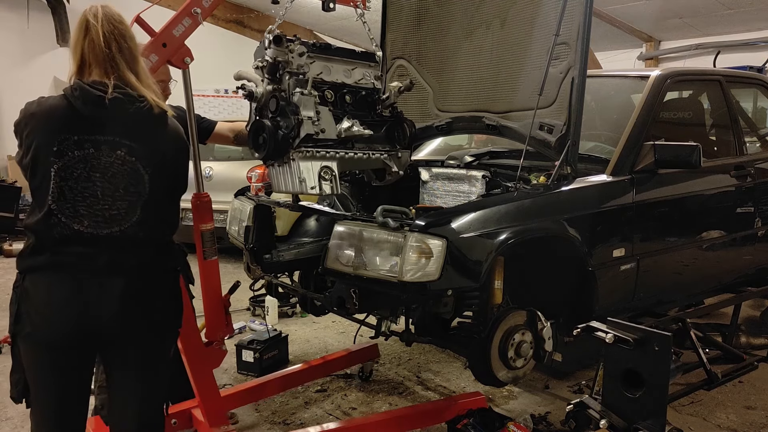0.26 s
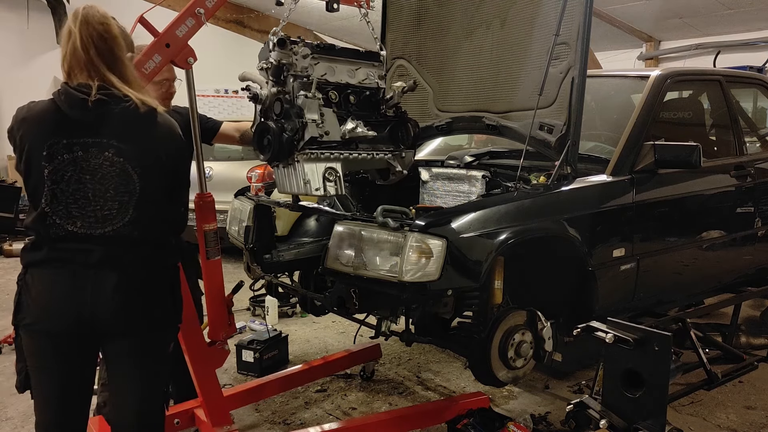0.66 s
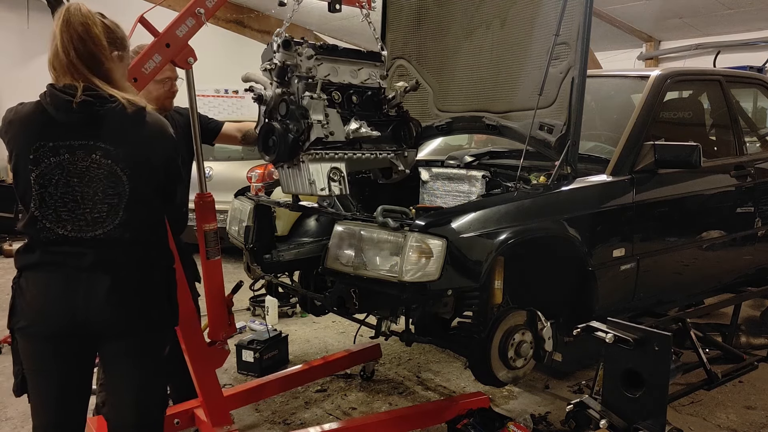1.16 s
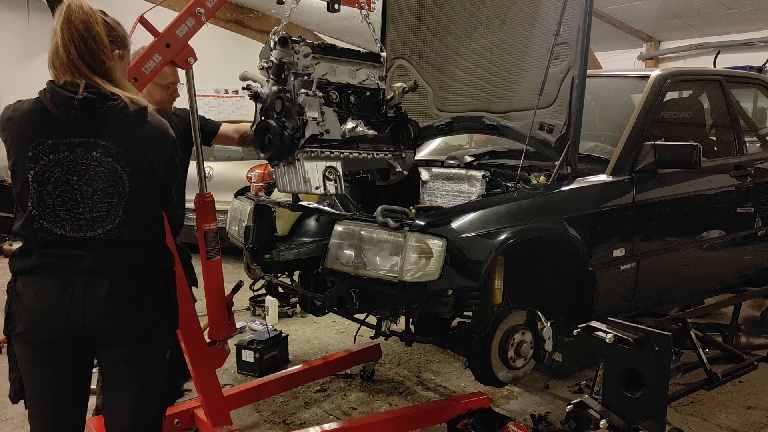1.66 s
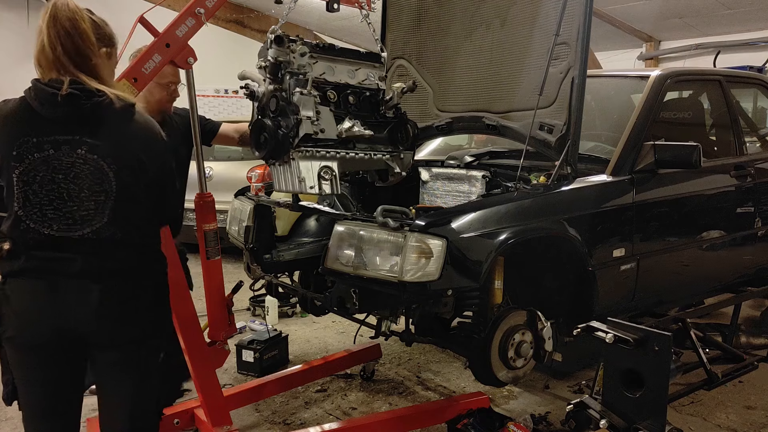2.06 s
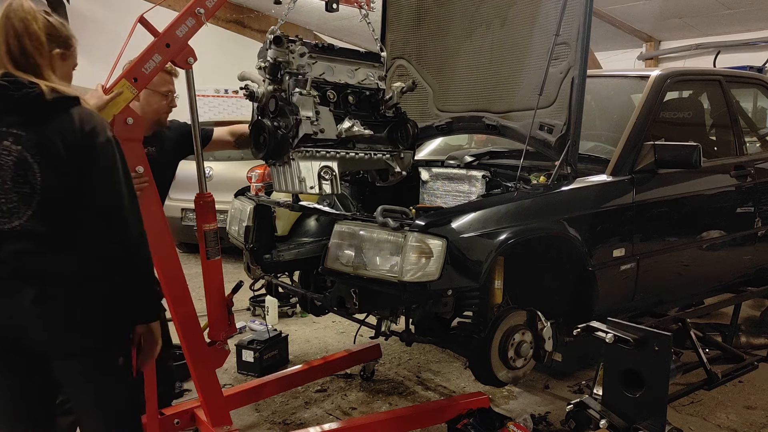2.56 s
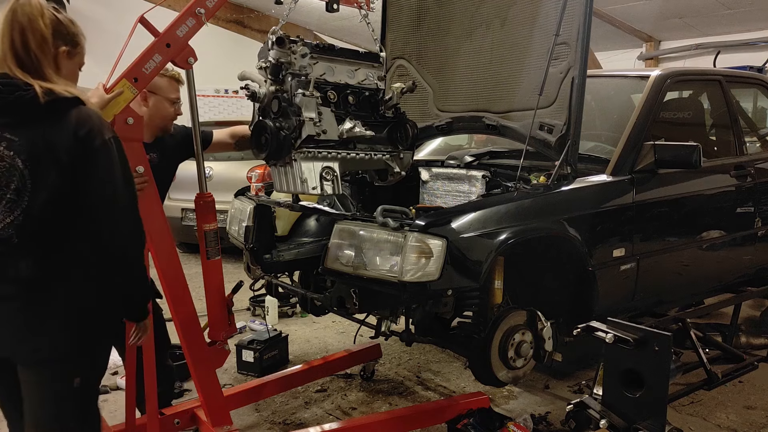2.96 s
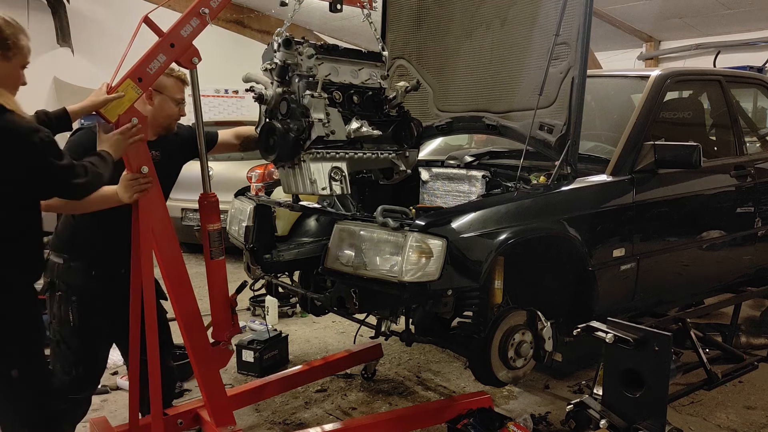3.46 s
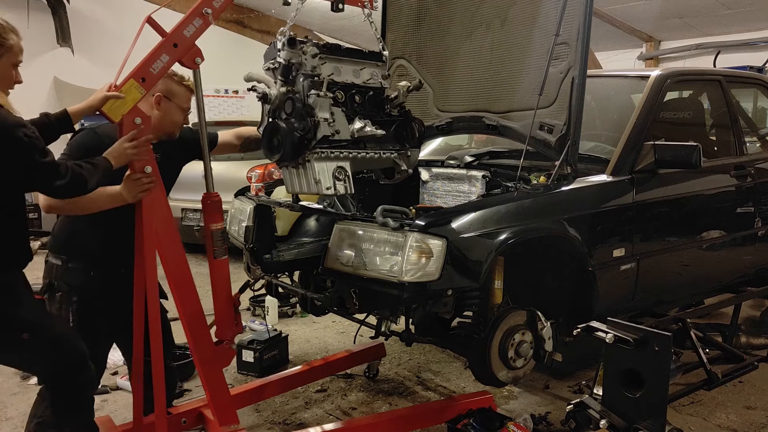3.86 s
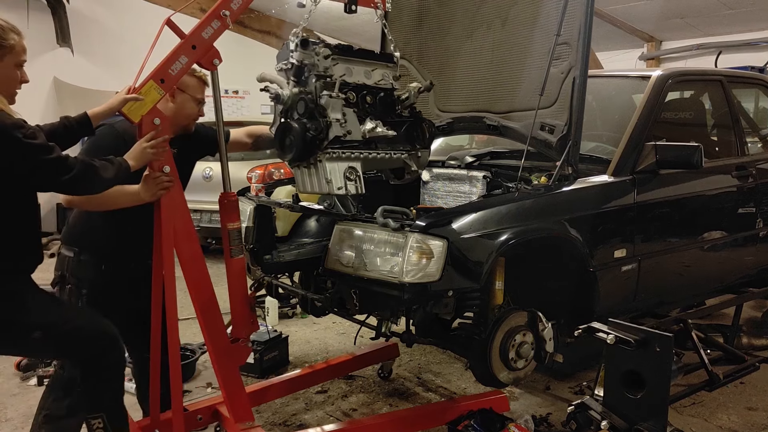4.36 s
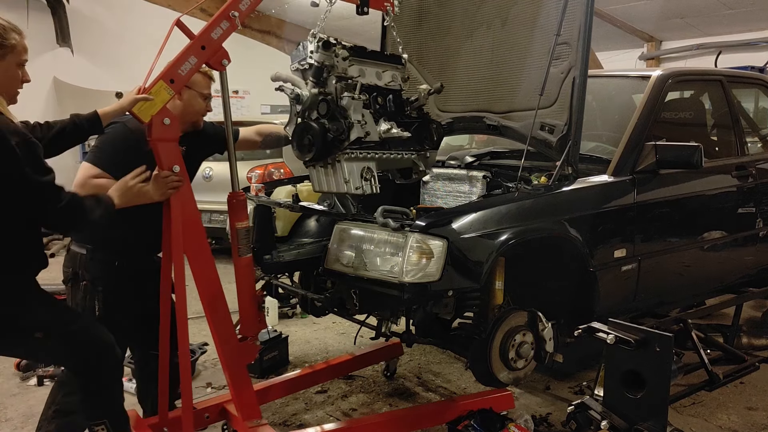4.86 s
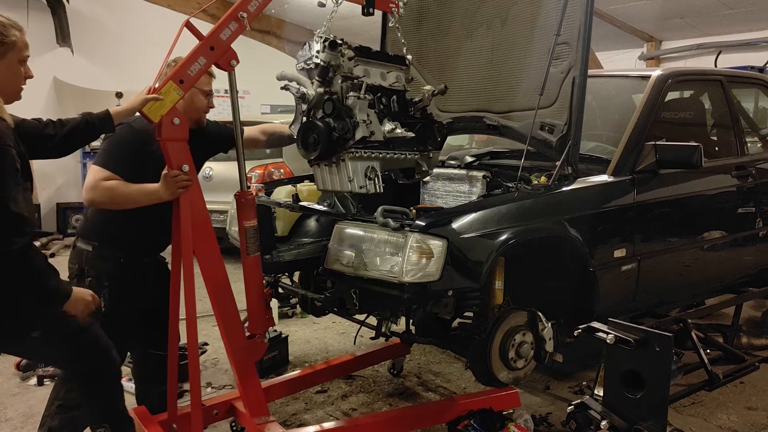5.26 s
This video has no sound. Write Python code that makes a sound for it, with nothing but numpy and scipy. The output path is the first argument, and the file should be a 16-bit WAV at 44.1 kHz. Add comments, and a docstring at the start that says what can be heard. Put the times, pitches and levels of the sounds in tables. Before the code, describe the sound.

In a hard-floored workshop, an engine hoist rattles at once: a quick cluster of steel knocks with chain jingle and gritty wheel crunch. Sparse faint clinks of a loose handle follow, then light knocks build around three seconds. Near four seconds a soft thud leads into the loudest clanging shove, which breaks into scattered knocks and chatter. Stereo pickup at moderate distance, short diffuse room tail, low hum beneath.

```python
"""A workshop with a concrete floor: an engine hoist is shoved over it, an engine hanging on its chain.
Random force bursts ring the modes of the steel frame, with a wash of fainter modes; single panel notes beat;
grit jolts the hoist's legs through the castors; a loose jack handle clinks; noise ticks mark small hard parts.
High chain links chatter, mostly left; shoes thud as short pressure swings.
A diffuse tail answers all of these, over steady coloured noise and a wavering low hum."""
import sys
import numpy as np
from scipy import signal
from scipy.fft import rfft, irfft
from scipy.io import wavfile
from scipy.ndimage import uniform_filter1d

SR = 44100
rng = np.random.default_rng(int(sys.argv[2]) if len(sys.argv) > 2 else 0)


def field_ratio(decibels):
    """Amplitude ratio for a level in dB (20 dB per decade); scalars and array-likes work."""
    return 10 ** (np.asarray(decibels, dtype=float) / 20)


def generate_wav(sig):
    """Save sig (samples, or channels by samples) to the path in sys.argv[1] as 16-bit PCM at SR."""
    pcm = np.round(np.clip(np.atleast_2d(sig).T, -1, 1) * 32767).astype(np.int16)
    wavfile.write(sys.argv[1], SR, pcm)


N = 243255


def unit(x):
    """Scale to rms 1."""
    return x / np.sqrt(np.mean(x ** 2))


def unit_energy(x):
    """Scale to a sum of squares of 1."""
    return x / np.sqrt(np.sum(x ** 2))


def fade(t, t60_s):
    """Exponential decay by 60 dB in t60_s."""
    return np.exp(-np.log(1000) * t / t60_s)


def colour(x, points):
    """Zero-phase filter through (Hz, dB) points, linear in dB over log frequency."""
    hz, db = np.transpose(points)
    size = x.shape[-1]
    log_hz = np.log(np.fft.rfftfreq(size, 1 / SR) + 1)
    gain = field_ratio(np.interp(log_hz, np.log(hz), db))
    return irfft(rfft(x) * gain, size)


def walk(rate_hz, size=N):
    """Slow chance of rms 1, turning about rate_hz times a second."""
    k = int(SR / rate_hz)
    return unit(uniform_filter1d(uniform_filter1d(rng.standard_normal(size), k), k))


def grit(rate_hz, scatter_db, size=N):
    """Random contacts, a few much harder than the rest; rms 1."""
    chance = rng.random((3, size))
    happens = chance[0] < rate_hz / SR
    sign = np.sign(chance[1] - 0.5)
    strength = field_ratio(-scatter_db * np.log(chance[2] + 0.02))
    return unit(happens * sign * strength + 1e-9)


def twin(size, least=0.12):
    """Two noises, much alike in the bass and nearly unrelated in the treble."""
    alike_hz = 905  # both microphone ports hear much the same below this
    mid, side = rfft(rng.standard_normal((2, size)))
    hz = np.fft.rfftfreq(size, 1 / SR)
    share = least + (1 - least) * hz ** 2 / (hz ** 2 + alike_hz ** 2)
    pair = mid + share * side * np.array([[1], [-1]])
    return irfft(pair / np.sqrt(1 + share ** 2), size)


def ring(modes, size=SR // 2, scatter_db=0, longest_s=0.18):
    """Response of struck modes (Hz, dB, T60 s); the spot struck scatters levels and detunes a little."""
    hz, db, t60_s = np.transpose(modes)[:, :, None]
    t = np.arange(size) / SR
    chance = rng.standard_normal((2, *db.shape))
    spot_hz = hz * (1 + 0.0012 * scatter_db * chance[1])
    pole = 2j * np.pi * spot_hz - np.log(1000) / np.minimum(t60_s, longest_s)
    phase = 2j * np.pi * rng.random(db.shape)
    return np.sum(field_ratio(db + scatter_db * chance[0]) * np.exp(pole * t + phase).imag, axis=0)


def split(x, edges_hz=(125, 500, 2500, 6000)):
    """Bass, middle and treble bands of a response, each of unit energy."""
    parts = []
    for k in range(3):
        band = signal.butter(3, edges_hz[k:k + 2], "band", fs=SR, output="sos")
        parts.append(unit_energy(signal.sosfilt(band, x)))
    return parts


def track(spans, levels, rest_db=-120):
    """Columns of several spans on the sample grid; the first few are levels, at rest_db between spans."""
    def edge(row, shift_s):
        return (row[0] + shift_s, *[rest_db] * levels, *row[1 + levels:])

    rows = np.concatenate([[edge(span[0], -0.02), *span, edge(span[-1], 0.05)] for span in spans])
    return [np.interp(np.arange(N) / SR, rows[:, 0], column) for column in rows.T[1:]]


def play(force, response):
    """A force rings a body: convolution."""
    full = signal.fftconvolve(np.atleast_2d(force), np.atleast_2d(response), axes=1)
    return full[:, :force.shape[-1]]


def add(out, start_s, x):
    """Mix a short sound in at start_s."""
    i = int(start_s * SR)
    out[:, i:i + x.shape[-1]] += x[..., :N - i]


def shop():
    """Steady hiss and rumble from coloured noise, with sines of wavering pitch and level as hum."""
    # Noise spectrum. Each row: frequency in Hz, relative density in dB per Hz.
    floor_spectrum = [(12, -69), (20, 2), (57, -5), (96, -13.5), (393, -27.5), (492, -27), (1320, -31),
                      (1790, -34.5), (3060, -33.5), (5070, -35.5), (7300, -49.5), (11100, -35),
                      (13600, -50), (15200, -37.5), (16500, -42)]
    # Hum. Each row: mean frequency in Hz, mean level in dB, rms waver in Hz.
    hums = [(46.8, -67.5, 4.36), (153.5, -81, 1.3)]
    out = field_ratio(-66) * unit(colour(twin(N, least=0.33), floor_spectrum))
    for hz, db, waver_hz in hums:
        level = field_ratio(db + 2.5 * walk(12.0))
        phase = 2 * np.pi * np.cumsum(hz + waver_hz * walk(9.7)) / SR
        out = out + level * np.sin(phase)
    return out


def shoes():
    """One soft, heavily damped swing of pressure per footfall."""
    # Shoes on concrete. Each row: start in seconds, peak in dB, rate in Hz (twice the swing frequency).
    thuds = [(2.382, -30.5, 716), (3.884, -20, 730)]
    out = np.zeros((2, N))
    t = np.arange(SR // 10) / SR
    for start_s, peak_db, hz in thuds:
        swing = np.gradient(np.sin(np.pi * hz * t) * hz * t * np.exp(-3.0 * hz * t))
        add(out, start_s, field_ratio(peak_db) * swing / np.max(np.abs(swing)))
    return out


def chain():
    """Small links tick against each other and ring briefly, mostly to the left."""
    # Shivers under shifting load, one list a span. Each row: time in seconds, level in dB.
    shivers = [
        [(0.13, -80), (0.15, -62), (0.2, -69), (0.33, -58), (0.374, -59), (0.42, -70), (0.5, -82)],
        [(3.11, -81), (3.155, -55.5), (3.21, -71), (3.3, -88), (3.43, -84), (3.5, -95), (3.63, -91)],
        [(3.91, -95), (3.935, -54), (4.01, -62), (4.13, -50), (4.21, -71), (4.35, -62), (4.51, -80),
         (4.54, -73), (4.63, -66), (4.72, -54), (4.8, -72), (4.83, -83), (5.04, -66.5), (5.08, -58),
         (5.13, -60), (5.21, -69.5), (5.42, -68), (5.51, -80)],
    ]
    # Links jerked together. Each row: time in seconds, level in dB.
    jingles = [(0.144, -46.5), (0.215, -37), (0.271, -36), (0.304, -36), (3.183, -51.5), (3.34, -74),
               (3.449, -63), (3.976, -41), (4.05, -40.5), (4.112, -38.5), (4.227, -52.5), (4.538, -56),
               (4.718, -41), (5.06, -44.5), (5.111, -38.5), (5.354, -53.5)]
    # Link modes. Each row: frequency in Hz, relative level in dB, T60 in seconds (capped below).
    link_modes = [(9176, -6, 0.018), (9350, -1, 0.037), (9470, 1.5, 0.03), (9700, -5, 0.028),
                  (11900, -10, 0.018), (12100, -8, .035), (13430, -15, 0.034), (15250, -10.5, .03),
                  (14800, -14, .03)]
    rise_s, fall_s = 0.003, 0.0097
    left_db, sway_db = 5, 4.0

    shiver_db, = track(shivers, levels=1)
    t = np.arange(N) / SR
    jerks = np.zeros(N)
    for time_s, db in jingles:
        jerks += field_ratio(db) * np.exp(np.minimum((t - time_s) / rise_s, (time_s - t) / fall_s))
    glance = (1 - np.exp(-t[:SR // 2] / 0.0006)) ** 2  # soft onset: links meet at a glance
    link = unit_energy(ring(link_modes, longest_s=0.033) * glance)
    force = grit(430.0, 3.0) * field_ratio(shiver_db + 3.05 * walk(60.0)) + grit(2000.0, 1.5) * jerks
    pan_db = left_db + sway_db * walk(8.0)
    return play(force, link) * field_ratio(np.array([pan_db, -pan_db]) / 2)


def ticks():
    """Small hard parts: a sharp noise click with a short hiss after it."""
    # Each row: start in seconds, peak in dB, hiss time constant in seconds.
    clicks = [(0.1421, -56, .01), (0.2084, -55, .009), (0.2683, -52, .01), (0.376, -30, 0.0087),
              (0.5279, -15.5, 0.0044), (1.332, -44, .004), (1.841, -50.5, .012), (2.385, -51, 0.017),
              (2.565, -49, 0.037), (2.648, -48.5, .01), (2.7169, -46, .01), (2.9464, -36.5, 0.037),
              (3.0177, -41.5, .014), (3.34, -44, .015), (3.4062, -53, .01), (3.6207, -47, .009),
              (3.8831, -56, .01), (3.9574, -49, .01), (4.0766, -28, .01), (4.3154, -57, .01),
              (4.536, -44, .01), (4.8846, -37, 0.012), (5.057, -65, 0.0091), (5.241, -36, 0.017)]
    body_db = -13.5
    out = np.zeros((2, N))
    t = np.arange(8192) / SR
    body_band = signal.butter(2, (700, 5000), "band", fs=SR, output="sos")
    bright_band = signal.butter(2, 6000, "high", fs=SR, output="sos")
    for start_s, peak_db, tail_s in clicks:
        noise = twin(len(t)) * (np.exp(-t / 0.00042) + 0.22 * np.exp(-t / tail_s))
        click = signal.sosfilt(bright_band, noise) + field_ratio(body_db) * signal.sosfilt(body_band, noise)
        add(out, start_s, field_ratio(peak_db) * click / np.max(np.abs(click)))
    return out


def handle():
    """The jack handle's tube clinks and chatters in its bracket; the spot hit sets low against upper modes."""
    # Clinks and bounces. Each row: start in seconds, level in dB, low modes in dB, upper modes in dB.
    clinks = [(0.6526, -51.5, 4.5, -12), (0.816, -64, 9, -5), (1.0557, -43.5, -4, -5.5),
              (1.091, -50.5, -7, -2.5), (1.209, -56, -1.5, -3.5), (1.2388, -50, -5.5, -3),
              (1.282, -64.5, -10, -7), (1.476, -43, -4.5, -7), (1.5144, -52.5, -3.5, -5),
              (1.616, -64, .5, -20), (1.6602, -67.5, 10.5, -5), (1.8954, -50, 1, -14.5),
              (2.0314, -70.5, 8.5, -2), (2.2918, -50, -4, -21.5), (3.1845, -40, 3.5, -4.5),
              (3.243, -46.5, 1.5, -20), (3.4252, -42.5, -1, -15), (3.572, -58, 4.5, -19),
              (3.8199, -44, -5, -4.5), (5.4345, -41.5, -3.5, -3.5)]
    # Tube modes. Each row: frequency in Hz, relative level in dB, T60 in seconds (capped below).
    tube_modes = [(1137, -8, 0.18), (1326, -2.5, 0.12), (1393, -11.5, 0.19), (1573, -13.5, 0.15),
                  (2620, -21, 0.089), (3068, 7, 0.036), (3095, -8, 0.086), (3832, 5.5, 0.052),
                  (4020, -9, 0.07), (5180, -7, 0.041), (5690, 3, 0.024), (6870, -10, 0.025)]
    bounce_db, bounce_s = -23, 0.016  # chatter after each clink

    groups = []
    for low_hz, high_hz in ((0, 2000), (2000, 3400), (3400, SR)):
        modes = [mode for mode in tube_modes if low_hz < mode[0] <= high_hz]
        groups.append(ring(modes, size=SR // 4, longest_s=0.06))
    low, middle, upper = groups
    out = np.zeros((2, N))
    t = np.arange(SR // 4) / SR
    swell = 1 - np.exp(-t / 0.0037)
    for start_s, db, low_db, upper_db in clinks:
        force = field_ratio(bounce_db) * grit(300.0, 1.7, size=len(t)) * np.exp(-t / bounce_s)
        force[0] = 1
        tube = swell * (field_ratio(low_db) * low + middle + field_ratio(upper_db) * upper)
        add(out, start_s, field_ratio(db) * play(force, tube))
    return out


def castors():
    """Grit under the wheels jolts the legs: a patchy crunch and a little ring."""
    # Grinding, one list a shove. Each row: time in seconds, level in dB, brightness in dB.
    shoves = [
        [(0.0, -76.5, -16), (0.12, -74.5, -17), (0.18, -55, -20), (0.31, -50, -20), (0.372, -52, -8),
         (0.47, -68.5, -6), (0.54, -66, -6), (0.63, -77, -9), (0.75, -85, -14)],
        [(2.5, -78, -1.5), (2.75, -66, -2), (2.9, -78, 1.5), (3.04, -74, 1.5), (3.17, -59, -0.5),
         (3.36, -67.5, -8), (3.46, -67, -5), (3.6, -78, 3.5), (3.7, -88, 0)],
        [(3.9, -65, -4), (4.012, -41.5, -13.5), (4.07, -41, -13), (4.212, -46.5, -16), (4.384, -60, 2),
         (4.5, -66, 1), (4.62, -58.5, -15.5), (4.74, -47, -12), (4.85, -63, -6), (4.93, -57.5, -6.5),
         (5.02, -63, -7), (5.12, -45.5, -19), (5.22, -55.5, -11), (5.37, -59.5, -13.5), (5.51, -67.5, -7.5)],
    ]
    # Leg modes. Each row: frequency in Hz, relative level in dB, T60 in seconds.
    leg_modes = [(150, -2.5, .08), (310, -6.5, 0.024), (506, -5, 0.14), (873, 3.5, 0.06),
                 (1134, -2.5, 0.096), (1384, 3.5, 0.086), (1629, -1.5, 0.053), (2110, -3.5, 0.15)]

    db, bright_db = track(shoves, levels=1)
    bass_db = db - 14.5 - 0.2 * bright_db  # duller grinding rumbles more
    treble_db = db + bright_db
    legs = field_ratio(-7.0) * unit_energy(ring(leg_modes, size=SR // 4))
    legs[:4] += 0.25  # the blunt jolt itself
    out, bumps = 0, walk(25.0)
    for level_db, part, apart in zip((bass_db, db, treble_db), split(legs), (0.12, 0.45, 0.9)):
        # wheels on both sides: the ports differ most in the treble
        grits = grit(900.0, 2.1) + apart * grit(900.0, 2.8) * np.array([[1], [-1]])
        patchy = field_ratio(level_db + 1.35 * bumps + 1.7 * walk(44.0))
        out = out + play(grits * patchy, part)
    return out


def panel():
    """Some blows leave a panel ringing on one note, split into a beating pair 3 % apart."""
    # Each row: start in seconds, level in dB, frequency in Hz, T60 in seconds.
    notes = [(0.142, -28, 858, 0.22), (0.527, -42.5, 923, 0.17), (3.534, -48, 772, 0.058),
             (4.329, -36, 845, 0.17), (4.894, -37.5, 882, 0.12), (5.159, -35.5, 229.6, 0.18)]
    out = np.zeros((2, N))
    swell = 1 - np.exp(-np.arange(SR // 2) / SR / 0.004)
    for start_s, db, hz, t60_s in notes:
        pair = [(hz, db, t60_s), (1.03 * hz, db - 4, t60_s)]
        add(out, start_s, swell * ring(pair, longest_s=0.4))
    return out


def frame():
    """Each knock is a first contact and a dying rattle, on one of eight spots of the steel."""
    # Each row: start in seconds, peak in dB, bass in dB, treble in dB, rattle time constant in seconds.
    knocks = [(0.141, -19, -6.5, -13.5, 0.0046), (0.154, -24.5, -25, -16, .014),
              (0.179, -26, -17, -18, 0.0075), (0.209, -21.5, -18, -14.5, 0.0086),
              (0.234, -30, -19, -15, .012), (0.27, -26.5, -19, -17, 0.026),
              (0.304, -29.5, -17, -17.5, 0.0079), (0.334, -24, -22, -21.5, 0.0095),
              (0.369, -33.5, -24, -20, 0.016), (0.526, -33, -32, -17.5, 0.0044),
              (0.653, -45.5, -42, 6, .01), (1.056, -52.5, -32, -11.5, .028), (1.239, -45, -46, -8, 0.0042),
              (1.475, -48.5, -46, -2, 0.0067), (1.664, -56, -15, -11, 0.021),
              (1.699, -56.5, -12, -19, 0.018), (1.85, -45.5, -15, -11, 0.017),
              (2.039, -59, -17, -15, 0.0078), (2.383, -39, -13.5, -17.5, 0.016),
              (2.628, -49.5, -35, -3, 0.0053), (2.716, -35.5, -30.5, -16, .016),
              (2.758, -39.5, -28.5, -13, 0.015), (2.946, -34, -23.5, -14, .01),
              (2.967, -48, -15, -20.5, 0.017), (3.087, -46, -17.5, -28, 0.011),
              (3.162, -33.5, -31, -16, 0.012), (3.184, -30.5, -28.5, -15.5, 0.015),
              (3.241, -35, -19, -4, 0.003), (3.403, -45.5, -36, -7, 0.0075), (3.426, -39, -39, -3, .012),
              (3.534, -46.5, -17, -23, 0.0051), (3.822, -47, -32, -13, 0.036),
              (3.883, -23, -2.5, -41, 0.0095), (3.959, -25, -10.5, -9.5, 0.019),
              (4.038, -23, -13.5, -10.5, 0.016), (4.072, -9, -20, -9.5, 0.0097),
              (4.084, -7.5, -21, -11.5, 0.0042), (4.104, -13, -11, -4, 0.0073),
              (4.129, -18, -35, -9, 0.023), (4.316, -23, -42, 15, 0.017), (4.327, -22, -48, 7, 0.0077),
              (4.379, -34.5, -47, -1, 0.023), (4.551, -30, -29, 2, 0.0078),
              (4.584, -36.5, -14.5, -15.5, 0.042), (4.659, -30, -16.5, -18, 0.015),
              (4.684, -27, -22.5, -14.5, 0.025), (4.722, -22.5, -14.5, -11, 0.013),
              (4.779, -34, -17, -13, 0.014), (4.894, -30, -37, -13.5, 0.0038),
              (4.934, -37.5, -50, -26, 0.011), (5.034, -32.5, -26, -14, 0.047),
              (5.06, -26, -21.5, -18, 0.009), (5.096, -19.5, -21, -14.5, .012),
              (5.129, -28, -10.5, -24, 0.02), (5.16, -31, -9, -23, 0.023), (5.243, -31, -17, -8, 0.017),
              (5.435, -36.5, -48, -1, 0.0097)]
    # Clear modes. Each row: frequency in Hz, relative level in dB, T60 in seconds (capped by ring).
    steel_modes = [(232.8, -14, 0.56), (803, 1, 0.23), (983, -8.5, 0.93), (1170, -1.5, 0.51),
                   (1218, 1.5, 1.1), (1483, 9.5, 0.77), (1580, -12.5, 0.69), (1800, -34.5, 1.1),
                   (1940, -5, 0.83), (1985, 7, 0.51), (2080, -13.5, 0.15), (2149, 13, 0.12),
                   (2430, -3, 0.79), (2380, -5.5, 0.6), (2440, -1.5, 1.3), (2430, -30, 0.28),
                   (2815, -28, 0.4), (2850, -8.5, 0.72), (3230, -4.5, 0.93), (3030, -24, 1.1),
                   (3500, -7, 0.1), (3600, -3.5, 0.76), (4460, -24.5, 0.66), (4050, -27.5, 0.46),
                   (4630, -46.5, 0.17), (5350, -59.5, 0.13), (6600, -13, 0.1), (6675, -69, 0.62)]
    # The many faint modes between them. Each row: frequency in Hz, relative density in dB per Hz.
    faint_spectrum = [(60, -49.5), (110, -15), (160, 3.5), (5500, -2.5), (7000, -22.5), (9400, -15.5),
                      (16000, -39.5)]
    # Their decay, a low and a high row. Each row: frequency in Hz, T60 in seconds.
    faint_decay = [(300, 0.091), (3000, 0.043)]

    out = np.zeros((2, N))
    size, lead = 16384, 64  # samples; the lead leaves room ahead of the onset for zero-phase filters
    t = np.arange(size) / SR
    spots = [unit(ring(steel_modes, size=size, scatter_db=5.0)) for _ in range(8)]
    (low_hz, low_t60_s), (high_hz, high_t60_s) = faint_decay
    crossover = [(low_hz, 0), (np.sqrt(low_hz * high_hz), 12), (high_hz, 0)]  # fills the dip between bands
    for k, (start_s, peak_db, bass_db, treble_db, rattle_s) in enumerate(knocks):
        burst = grit(2000.0, 4.1, size=size) * np.exp(-t / rattle_s)
        burst *= 1 - np.exp(-t / (0.22 * rattle_s))  # long rattles swell in
        burst[0] = 1.8 + 0.03 / rattle_s  # short ones lead with a hard blow

        # every knock stirs another mix of the faint modes; the treble dies first
        low = colour(twin(size), [(low_hz, 0), (high_hz, -30)]) * fade(t, low_t60_s)
        high = colour(twin(size), [(low_hz, -30), (high_hz, 0)]) * fade(t, high_t60_s)
        wash = colour(np.roll(low + high, lead, axis=1), crossover)
        wash = unit(colour(wash, faint_spectrum))

        body = field_ratio(-12.5) * np.roll(spots[k % len(spots)], lead) + wash
        middle_db = 3 + 0.43 * treble_db + 0.22 * peak_db  # brighter and harder knocks: fuller near 2 kHz
        body = colour(body, [(160, bass_db - 1.0), (330, bass_db - 2.0), (600, 0.3 * bass_db - 5),
                             (1100, -6.0), (2000, middle_db), (3000, treble_db), (4200, treble_db),
                             (5500, treble_db - 7.5)])
        hit = play(burst, body)
        add(out, start_s - lead / SR, field_ratio(peak_db) * hit / np.max(np.abs(hit)))
    return out


def room(x):
    """Direct sound, a touch earlier on the left, then the workshop's diffuse tail, whose top fades first."""
    t60_s, top_t60_s, tail_db = 0.27, 0.19, -6
    t = np.arange(SR // 2) / SR
    noise = twin(len(t))
    low = signal.sosfilt(signal.butter(2, 6000, fs=SR, output="sos"), noise)
    response = low * fade(t, t60_s) + (noise - low) * fade(t, top_t60_s)
    response *= 1 - np.exp(-t / 0.0029)
    response *= field_ratio(tail_db) / np.sqrt(np.sum(response ** 2) / 2)
    response[0, 0] += 1
    response[1, 3] += 1  # three samples later
    return play(x, response)


def scene():
    """All sources in one room over its floor noise."""
    sources = shoes() + chain() + ticks() + handle() + castors() + panel() + frame()
    return room(sources) + shop()


def band_limit(x):
    """A steep low-pass at the top of the band."""
    return signal.sosfilt(signal.butter(12, 16980, fs=SR, output="sos"), x)


def record(dry):
    """A steep elliptic low-pass cuts the top above 16.1 kHz."""
    top_cut = signal.ellip(8, 0.2, 70, 16100, fs=SR, output="sos")
    mix = signal.sosfilt(top_cut, dry)
    return band_limit(mix)


dry = scene()
out = record(dry)
generate_wav(out)
```